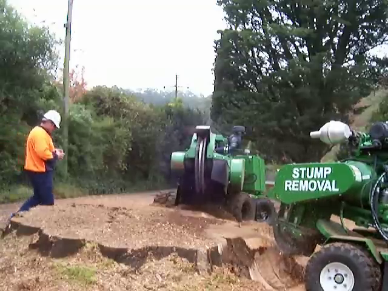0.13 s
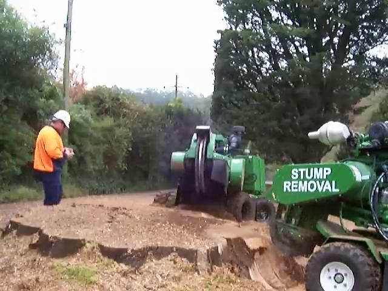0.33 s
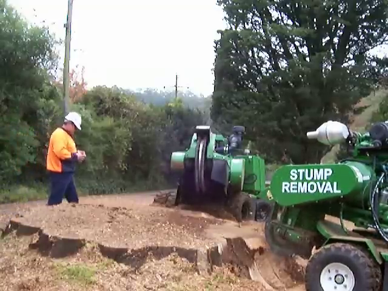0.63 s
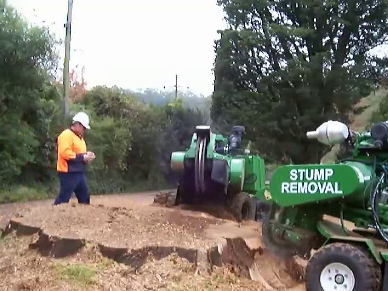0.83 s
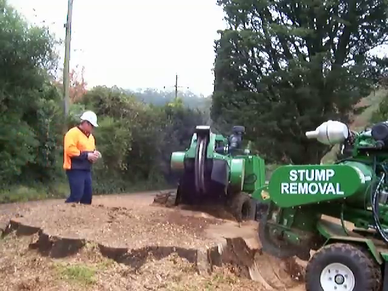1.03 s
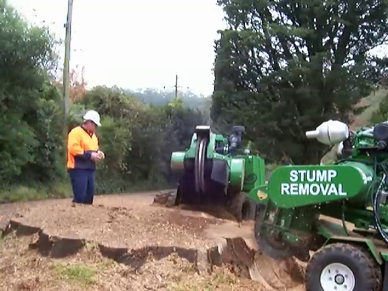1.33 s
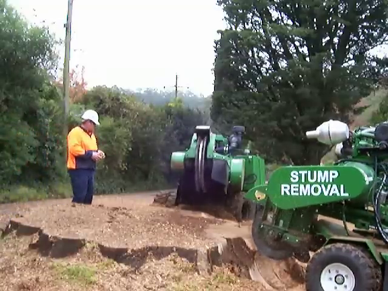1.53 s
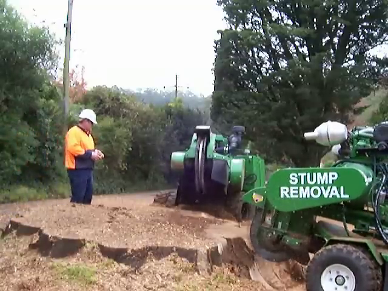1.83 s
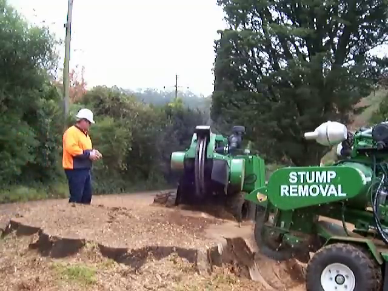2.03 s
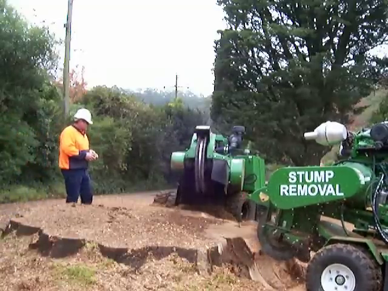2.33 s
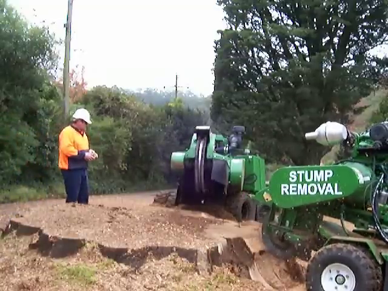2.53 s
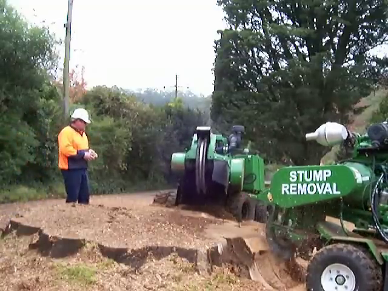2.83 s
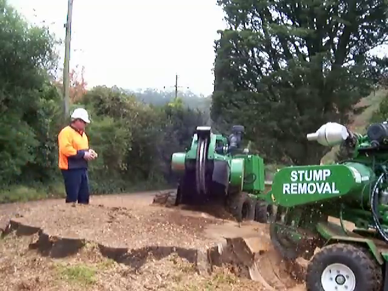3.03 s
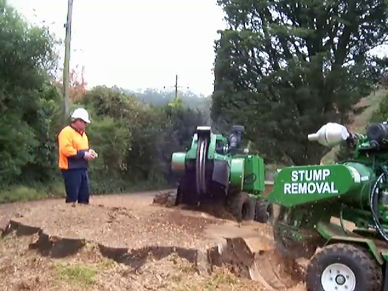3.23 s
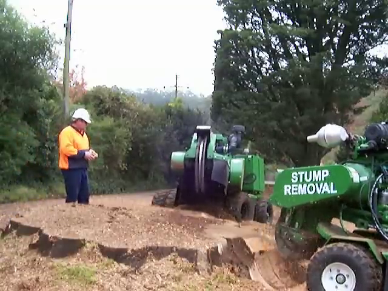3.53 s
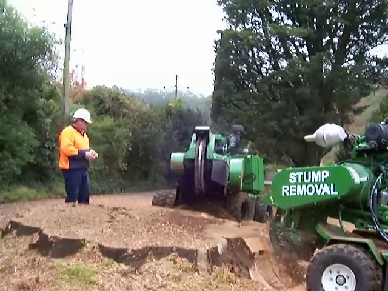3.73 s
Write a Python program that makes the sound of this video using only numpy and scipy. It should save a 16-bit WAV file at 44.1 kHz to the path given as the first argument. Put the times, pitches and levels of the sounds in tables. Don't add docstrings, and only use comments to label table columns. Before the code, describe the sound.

Loud stump grinding outdoors: continuous low engine throb from two machines, airy roar and pump whine, with fast crackling wood chips swelling and easing, strong early, mid and late; mono, close machinery, limited treble.

```python
import sys
import numpy as np
from scipy import signal
from scipy.fft import rfft, irfft
from scipy.io import wavfile
from scipy.ndimage import uniform_filter1d

SR = 44100
rng = np.random.default_rng(int(sys.argv[2]) if len(sys.argv) > 2 else 0)


def file_out(sig):
    cols = np.atleast_2d(sig).T
    lim = np.clip(cols, -1, 1)
    pcm = np.round(lim * 32767).astype(np.int16)
    wavfile.write(sys.argv[1], SR, pcm)


def gain_from_decibels(decibels):
    exponent = np.asarray(decibels, float) / 20
    return 10 ** exponent


N = 171108
TIME = np.arange(N) / SR
FAR_CYCLE_HZ = 24.935


def evened(x):
    return x / np.sqrt(np.mean(x ** 2) + 1e-20)


def read(points, hz):
    f, db = np.transpose(points)
    return np.interp(np.log(hz + 1), np.log(f + 1), db)


def resonance(hz, centre_hz, width_hz):
    return 1 / (1 + (2 * (hz - centre_hz) / width_hz) ** 2)


def slow(rate_hz):
    steps = rng.standard_normal(400)
    return np.interp(TIME * rate_hz, np.arange(len(steps)), steps) * np.sqrt(3 / 2)


def lines(turns, table, wobble):
    wobble_hz, phase_bend = 9, .11
    out = np.zeros(N)
    for order, db in table:
        shake = 1 + wobble * (slow(wobble_hz) + 1j * slow(wobble_hz))
        phase = np.exp(2j * np.pi * (order * turns + phase_bend * order ** 2))
        out += np.sqrt(2) * gain_from_decibels(db) * (shake * phase).real
    return out


def load():
    s, first_db, second_db = np.transpose(BITE)[:3]
    effort = (np.maximum(first_db, second_db) + 44.5) / 18
    return np.interp(TIME, s, np.clip(effort, 0, 1))


def strained(x, extra_db):
    return x * gain_from_decibels(extra_db * uniform_filter1d(load(), size=8000))


# centre in seconds, length in seconds, level in dB, centre pitch in Hz.
GUST_SWELLS = [
    (.06, .06, -29, 150),
    (1.85, 0.045, -30, 150),
    (2.1, .12, -32.5, 80),
    (3.36, .1, -36, 75),
    (3.46, 0.062, -30.5, 150),
]


def gusts():
    hz = np.fft.rfftfreq(N, 1 / SR)
    out = np.zeros(N)
    for s, length, db, centre_hz in GUST_SWELLS:
        band = np.exp(-(np.log2((hz + 1) / centre_hz) / .45) ** 2)
        rumble = irfft(rfft(rng.standard_normal(N)) * band, N)
        out += gain_from_decibels(db) * evened(rumble) * np.exp(-((TIME - s) / length) ** 2)
    return out


# frequency in Hz, level in dB per Hz.
ROAR_COLOUR = [(28, -23.5), (90, -12), (180, -4.5), (260, -12), (480, -18.5), (914, -15.5), (6030, -33.5),
               (8300, -50)]
# centre in Hz, width in Hz, level in dB.
CASING_RINGS = [(177.4, 19, -33.5), (384, 70, -40), (575, 72, -44.5), (1004, 190, -50), (1740, 280, -45.5),
                (7100, 820, -57)]
# time in seconds, gain in dB.
ROAR_SWELL = [(0, -0.5), (.35, 1.05), (.8, 3), (1.4, -0.3), (1.75, -0.5), (2.0, 1.8), (2.3, -1.9),
              (2.6, -0.1), (2.9, -1.5), (3.4, 2.3), (3.88, -0.3)]


def roar():
    roar_db, patch_db, throb_depth = -30.5, 1, 0.11
    frames, hz = N // 256 + 5, np.fft.rfftfreq(1024, 1 / SR)
    a, b, patches = rng.standard_normal((frames, 513, 3)).T
    patches = uniform_filter1d(patches, size=10, axis=0)
    patches = evened(uniform_filter1d(patches, size=12, axis=1))
    z = (a + 1j * b) * gain_from_decibels(read(ROAR_COLOUR, hz)[:, None] + patch_db * patches)
    air = gain_from_decibels(roar_db) * evened(signal.istft(z, nperseg=1024, noverlap=768)[1][:N])

    hz = np.fft.rfftfreq(N, 1 / SR)
    white = rfft(rng.standard_normal(N))
    for centre_hz, width_hz, db in CASING_RINGS:
        air += gain_from_decibels(db) * evened(irfft(white * resonance(hz, centre_hz, width_hz), N))
    throb = 1 + throb_depth * np.cos(2 * np.pi * 3 * FAR_CYCLE_HZ * TIME)
    return air * throb * gain_from_decibels(np.interp(TIME, *np.transpose(ROAR_SWELL)))


# order of the engine cycle, level in dB.
FAR_EXHAUST = [(2, -40.5), (3, -62.5), (4, -40), (6, -25), (8, -55), (9, -42), (10, -54.5), (11, -51),
               (12, -35.5), (13, -42), (14, -65.5), (15, -42.5), (16, -46.5), (17, -44.5), (18, -62),
               (20, -45), (21, -48), (22, -48.5), (23, -43.5), (25, -50), (26, -50), (28, -50), (43, -61.5),
               (44, -55), (45, -67), (50, -70), (54, -52), (69, -51)]


def far_engine():
    sag_s, sag_hz = 3.2, .12
    cycles = FAR_CYCLE_HZ * TIME - sag_hz * np.maximum(TIME - sag_s, 0)
    return lines(cycles, FAR_EXHAUST, wobble=.07)


# time in seconds, pump pulse rate in Hz.
PUMP_SPEED = [(0.0, 131.9), (0.25, 131.78), (0.5, 130.37), (0.75, 130.61), (1.0, 130.33), (1.25, 130.45),
              (1.5, 130.52), (1.75, 131.56), (1.9, 130.94), (2.05, 129.7), (2.25, 129.68), (2.5, 130.22),
              (2.75, 130.34), (3.0, 131.05), (3.25, 131.54), (3.45, 131.56), (3.65, 130.18), (3.88, 127.8)]


def pulses():
    return np.cumsum(np.interp(TIME, *np.transpose(PUMP_SPEED))) / SR


# order of the engine cycle, level in dB.
NEAR_EXHAUST = [(3, -33), (4, -47.5), (5, -52), (6, -26.5), (7, -36), (8, -44.5), (9, -34), (12, -77.5),
                (15, -52.5)]


def near_engine():
    cycle_per_pulse, crank_lead = .1914, .16
    cycles = cycle_per_pulse * pulses() + crank_lead
    return strained(lines(cycles, NEAR_EXHAUST, wobble=.08), extra_db=0.85)


# harmonic of the pulse rate, level in dB.
PUMP_WHINE = [(1, -55.5), (2, -46.5), (3, -37.5), (4, -48.5), (5, -43), (6, -44.5), (7, -43), (8, -51.5),
              (9, -59), (10, -57), (16, -57)]


def pump():
    return strained(lines(pulses(), PUMP_WHINE, wobble=.2), extra_db=4)


TEETH_AT_TURN = [.03, .42]


def tooth_strikes():
    half_turns = .3445 * pulses()
    turn, tooth = np.divmod(np.arange(2 * int(half_turns[-1])), 2)
    at = np.interp(turn + np.take(TEETH_AT_TURN, tooth), half_turns, TIME)
    return at, turn, tooth


# frequency in Hz, level in dB.
CRACK_COLOUR = [(700, -18), (1800, -7), (3200, -0.5), (5000, -2.5), (7300, 2), (8200, -11)]
# centre in Hz, width in Hz, boost in dB.
GUARD_RINGS = [(2710, 440, 6.5), (3580, 280, 4), (4180, 300, 2.5), (5500, 300, 1.5)]


def chip_colour(hz, pitch_hz):
    bump_db, chip_db, chip_octaves = 1.8, 5, 0.55
    bump_hz = np.linspace(0, SR / 4, 24)
    bumps = np.array([np.interp(hz, bump_hz, row) for row in rng.standard_normal((len(pitch_hz), 24))])
    peak = np.exp(-(np.log2((hz + 1) / pitch_hz) / chip_octaves) ** 2)
    colour_db = read(CRACK_COLOUR, hz) + bump_db * bumps + chip_db * peak
    for ring_hz, width_hz, ring_db in GUARD_RINGS:
        colour_db += ring_db * resonance(hz, ring_hz, width_hz)
    return colour_db


# time in seconds, first teeth in dB, second teeth in dB, chip pitch in Hz, tear in ms.
BITE = [(0, -53.5, -57.5, 3500, 4.2), (.22, -51, -70, 3600, 2), (0.309, -32, -30.5, 3470, 2.6),
        (.45, -48.5, -28.5, 3050, 2), (.78, -37.5, -33, 6200, 2.8), (0.899, -54, -28, 4600, 2.5),
        (1.33, -35.5, -36.5, 4600, 3), (1.55, -50.5, -45.5, 4230, 1.9), (1.799, -49, -47, 6000, 3),
        (1.952, -35, -29, 5500, 3.5), (2.121, -31, -42.5, 5580, 3.6), (2.251, -43.5, -49, 6330, 7.5),
        (2.501, -35, -41, 6870, 1.9), (2.72, -41, -40, 6400, 1.6), (2.95, -53, -51, 6480, 4.8),
        (3.5, -45.5, -45.5, 4000, 2.4), (3.59, -28, -31, 3230, 1.1), (3.749, -45.5, -30, 3450, 2.4)]
ODD_TURN_DB = [-3.5, -1.4]
# time in seconds, extra level in dB.
HARD_KNOTS = [
    (.267, 8.5),
    (.385, 4.5),
    (.61, 2),
    (.875, 5.5),
    (1.975, 3.5),
    (2.134, 1.5),
    (2.53, 5),
    (3.6, 3.5),
    (3.676, 4),
]


def wheel():
    jitter_s, spread_db, early_share = .0003, 1.2, 1.1
    snap_db, snap_spread_db, snap_s = 10, 2.2, .00005
    ring_share, echo_s, echo_db = .55, 0.0077, -5.5
    size, lead = 1024, 64

    at, turn, tooth = tooth_strikes()
    luck = np.clip(rng.standard_normal((len(at), 5)), -2, 2)
    at = at + jitter_s * luck[:, 0]
    s, first_db, second_db, chip_hz, tear_ms = np.transpose(BITE)
    db = np.where(tooth, np.interp(at, s, second_db), np.interp(at, s, first_db))
    db += np.take(ODD_TURN_DB, tooth) * (turn % 2 - .5) + spread_db * luck[:, 1]
    knot_db = sum(extra_db * (abs(at - knot_s) < .004) for knot_s, extra_db in HARD_KNOTS)
    db += knot_db
    pitch_hz = np.interp(at, s, chip_hz)[:, None] * (1 + 0.027 * luck[:, 4:])
    tear_s = np.interp(at, s, tear_ms)[:, None] / 1000
    at = at - early_share * (tear_s[:, 0] - .002)

    t = np.arange(size) / SR
    tear = np.minimum(t / 0.00073, 1) * np.exp(-np.maximum(t - tear_s, 0) / (ring_share * tear_s))
    snap_at = tear_s * (1 + 0.28 * luck[:, 2:3])
    snap = gain_from_decibels(snap_db + knot_db[:, None] + snap_spread_db * luck[:, 3:4])
    snap = snap * np.exp(-((t - snap_at) / snap_s) ** 2)
    echo = gain_from_decibels(echo_db) * np.minimum(t / tear_s, 1) * np.exp(-t / echo_s)
    chips = rng.standard_normal((len(at), size)) * (tear + echo) + snap

    colour_db = chip_colour(np.fft.rfftfreq(size, 1 / SR), pitch_hz)
    chips = irfft(rfft(np.roll(chips, lead, axis=1)) * gain_from_decibels(colour_db))
    chips *= gain_from_decibels(db - 5)[:, None] / chips.std(axis=1, keepdims=True)
    out = np.zeros(N + size)
    start = np.clip(at * SR - lead, 0, N).astype(int)
    np.add.at(out, start[:, None] + np.arange(size), chips)
    return out[:N]


def scene():
    mix = gusts() + roar() + far_engine() + near_engine() + pump() + wheel()
    return mix[None]


def top_cut(x):
    return signal.sosfilt(signal.butter(12, 8850, fs=SR, output="sos"), x)


def record(dry):
    hz = np.fft.rfftfreq(N, 1 / SR)
    dip_hz, dip_width_hz, edge_hz, edge_width_hz = 6895, 60, 8620, 150
    dip = 1 - .9 / (1 + ((hz - dip_hz) / dip_width_hz) ** 2)
    edge = gain_from_decibels(-9 * np.logaddexp(0, (hz - edge_hz) / edge_width_hz))
    mix = irfft(rfft(dry) * dip * edge, N)
    return top_cut(mix)


dry = scene()
out = record(dry)
file_out(out)
```